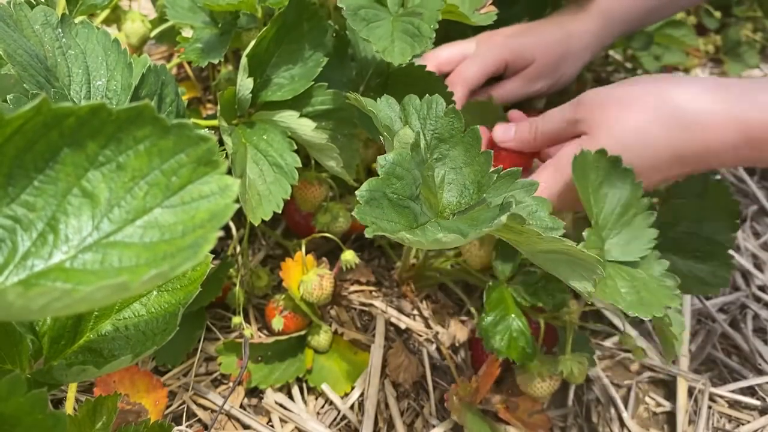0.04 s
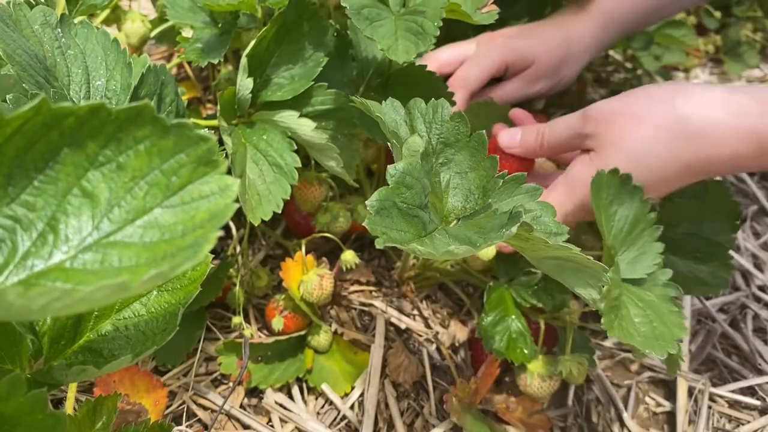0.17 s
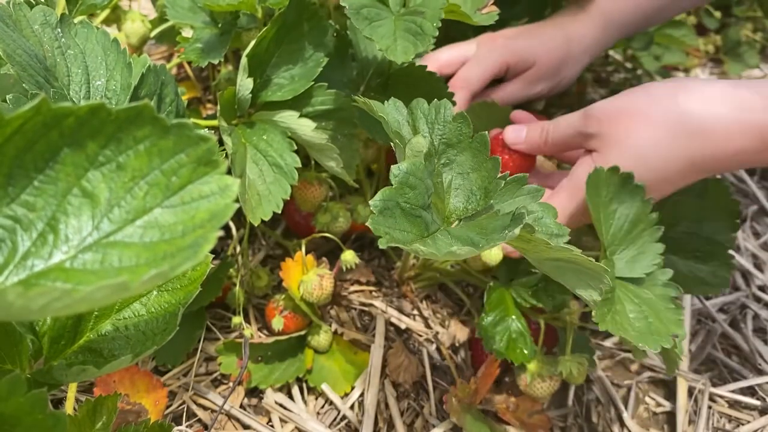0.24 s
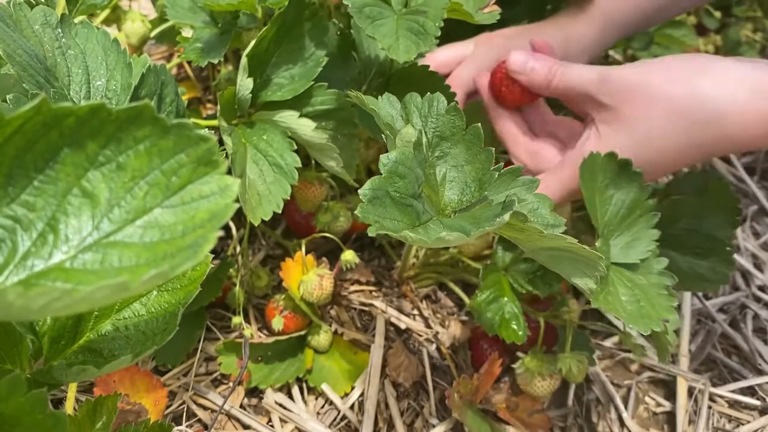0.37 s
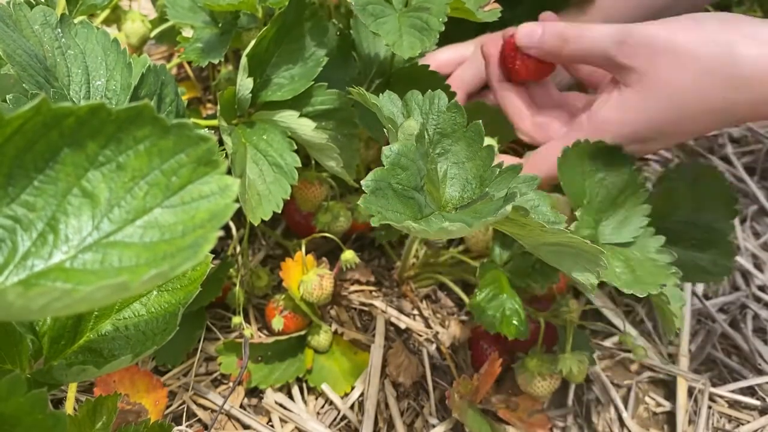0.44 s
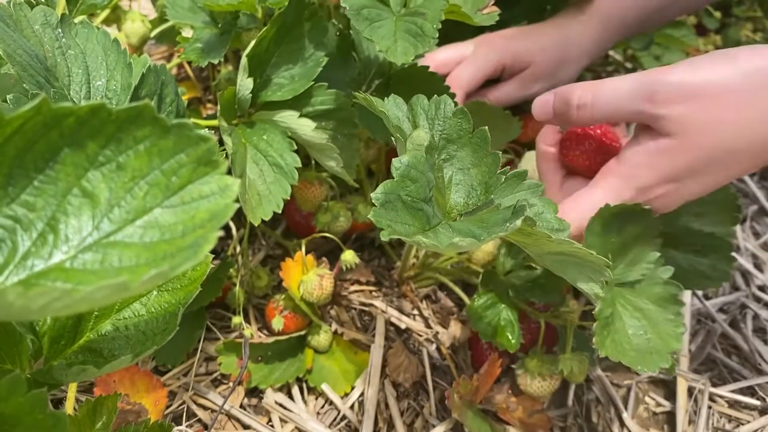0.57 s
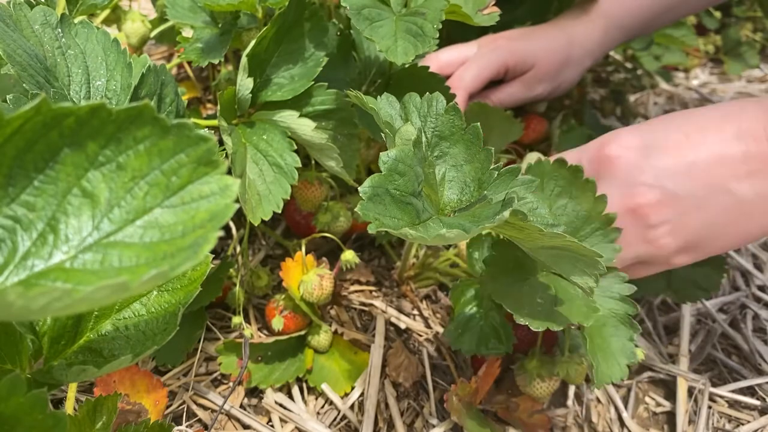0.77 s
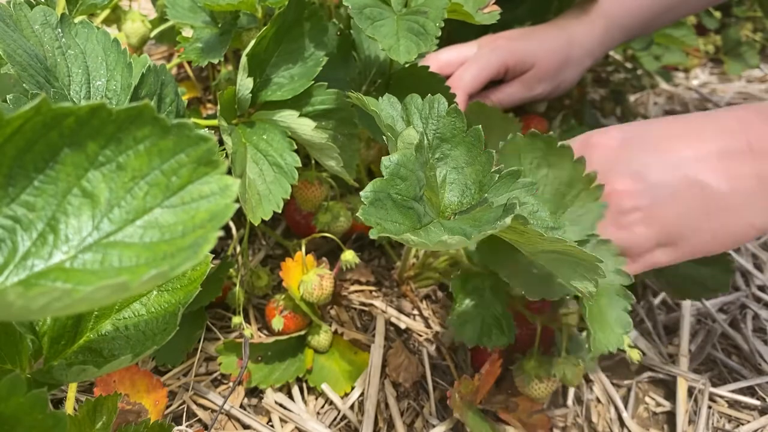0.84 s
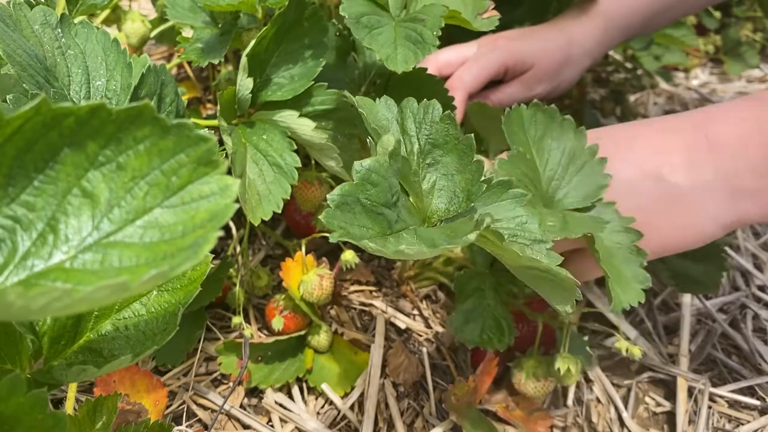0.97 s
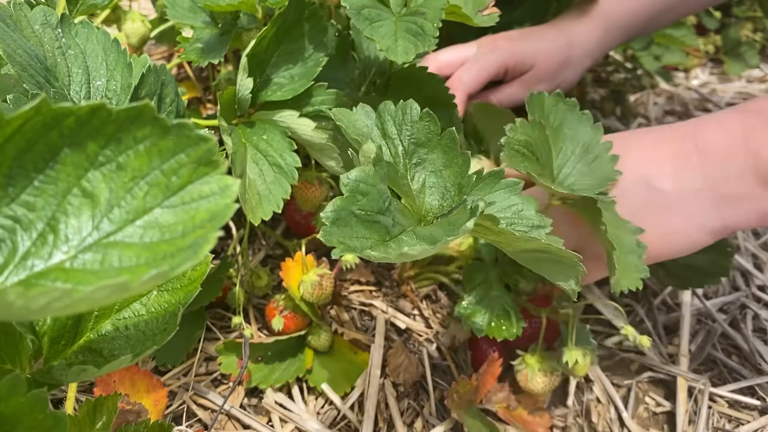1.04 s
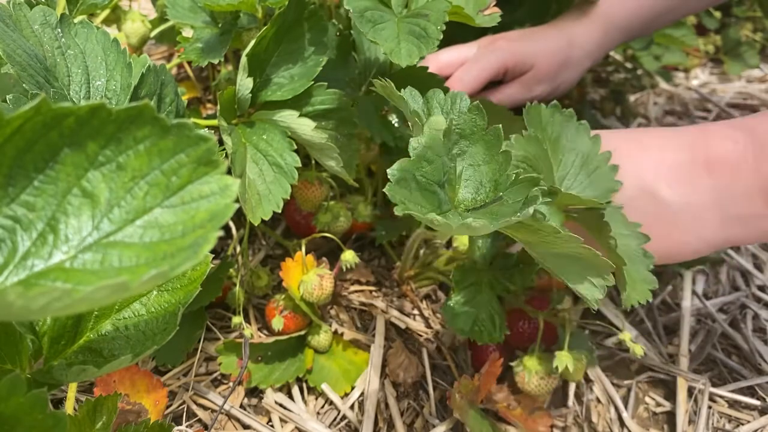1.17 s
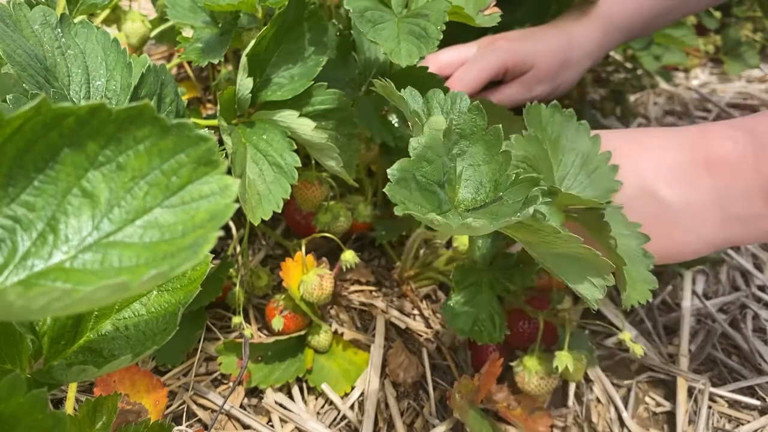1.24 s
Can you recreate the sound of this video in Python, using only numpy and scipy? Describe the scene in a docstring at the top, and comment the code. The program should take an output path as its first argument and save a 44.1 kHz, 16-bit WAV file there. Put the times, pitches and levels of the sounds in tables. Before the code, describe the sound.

One crisp snap of a plucked strawberry, then a hand brushing lightly through leaves.

```python
"""In an open field, a strawberry is picked by hand, close to the microphone.
The taut stalk tears and snaps, and the fruit knocks softly into the fingers. The plant springs back,
then the hand reaches in again and brushes through the leaves, which catch and slip on each other.
Stalks and straw tick here and there over a low outdoor rumble and a faint hiss of air."""
import sys
import numpy as np
from scipy import signal
from scipy.fft import rfft, irfft
from scipy.io import wavfile
from scipy.ndimage import uniform_filter1d

SR = 44100
rng = np.random.default_rng(int(sys.argv[2]) if len(sys.argv) > 2 else 0)


def file_out(sig):
    """Save sig as 16-bit WAV at sys.argv[1]."""
    # one column per channel
    cols = np.atleast_2d(sig).T
    # limit, then scale
    lim = np.clip(cols, -1, 1)
    pcm = np.round(lim * 32767).astype(np.int16)
    wavfile.write(sys.argv[1], SR, pcm)


N = 57330
TIME = np.arange(N) / SR
BIN_HZ = np.maximum(np.arange(N // 2 + 1) * SR / N, 1)

# A "colour" says how strong the low and high pitches of a noise are, compared with each other.
# Colour of the outdoor rumble: pitch_hz, level_db
RUMBLE_COLOUR = [(25, -41), (38, -4), (56, 10), (80, 3), (110, -6), (160, -27)]
# Puffs of air on the microphone: peak_s, level_db, half_length_s
PUFFS = [(0.035, -58.5, 0.025), (.105, -53.5, 0.017), (.335, -52, 0.01), (0.488, -54, 0.021),
         (0.606, -62, 0.0092), (0.78, -58.5, .02), (0.92, -63.5, 0.041), (1.077, -60.5, 0.035),
         (1.142, -57.5, 0.015), (1.259, -59, 0.033)]
# Colour of the far hiss of air: pitch_hz, level_db
AIR_COLOUR = [(250, 2), (600, -3), (1100, -6.5), (1650, -2), (2250, 3), (3000, -7), (3600, -4), (4300, -13),
              (5200, -1), (7000, -19), (15000, -20.5)]
# Loudness of the moving arm and plant: time_s, level_db
MOVEMENT_LEVELS = [(0, -63), (.2, -67.5), (.28, -58.5), (.42, -71), (.485, -59.5), (.55, -71), (.8, -61),
                   (.95, -65), (1.05, -61), (1.17, -66.5), (1.3, -61)]
# Colour of that movement: pitch_hz, level_db
MOVEMENT_COLOUR = [(60, -7), (115, 1.5), (190, -2), (260, -10), (400, -18), (700, -33), (1500, -38)]
# How hard the leaves are brushed: time_s, level_db
BRUSH_LEVELS = [(0, -79), (.025, -65), (.08, -105), (.22, -92), (.27, -63), (.295, -59), (.33, -68),
                (.44, -80), (.63, -75.5), (.73, -68.5), (.775, -67), (.825, -63.5), (.852, -62),
                (.878, -64), (.898, -62.5), (.95, -70), (1.01, -67), (1.19, -72), (1.255, -64.5),
                (1.3, -73)]
# Colour of the brushing: pitch_hz, level_db
BRUSH_COLOUR = [(250, -7.5), (600, -1), (1300, -3), (2600, 3), (4400, -1), (6500, -11.5), (8400, -35),
                (16000, -29)]
# Loudness of skin sliding on leaves: time_s, level_db
SLIDE_LEVELS = [(0, -70), (.02, -64.5), (.09, -83), (.13, -77.5), (.23, -79.5), (.265, -65.5), (.3, -67.5),
                (.37, -82.5), (.41, -73), (.455, -101), (.51, -77.5), (.56, -94), (.67, -77), (.77, -68.5),
                (.86, -62.5), (.95, -72.5), (1.01, -63), (1.19, -74.5), (1.25, -66), (1.3, -71.5)]
# Colour of a fine hiss as the microphone hears it, with a thin high sheen: pitch_hz, level_db
FINE_HISS_COLOUR = [(3000, -5), (5500, 1), (7300, 0), (8400, -12.5), (9400, 2.5), (10300, 3.5), (11200, -3),
                    (12200, -15), (13600, 0.5), (15000, -11), (16000, -23)]
# Flicks of stalks and leaf edges: start_s, level_db, pitch_hz, fade_s (time to fall by 60 dB)
TICKS = [(0.0464, -57.5, 3970, 0.011), (0.1475, -62.5, 9300, 0.0098), (0.187, -58, 10000, 0.0066),
         (.2055, -53, 6600, 0.0077), (0.2822, -44, 3940, 0.008), (0.2867, -50.5, 4000, .015),
         (0.316, -61, 2320, 0.016), (0.4976, -55, 2380, 0.013), (0.498, -60.5, 9900, 0.01),
         (0.5248, -53.5, 3320, 0.019), (0.525, -64, 9550, 0.01), (0.592, -64, 10000, 0.014),
         (0.7148, -60, 9500, 0.016), (0.757, -57, 1120, 0.015), (.765, -52.5, 3220, 0.022),
         (0.7691, -50, 2860, 0.023), (.793, -55.5, 3300, 0.016), (0.7724, -55, 1260, 0.023),
         (0.8364, -47.5, 2480, 0.018), (0.8421, -48, 2650, .016), (0.8465, -53.5, 655, 0.029),
         (0.8471, -48.5, 5600, 0.019), (0.8578, -44.5, 2680, 0.015), (0.865, -45, 900, 0.015),
         (0.8672, -50, 647, 0.028), (0.888, -46.5, 1210, 0.017), (0.886, -46, 4950, 0.011),
         (.9895, -71, 9500, .015), (0.996, -58, 9600, 0.019), (1.054, -66, 696, 0.023),
         (1.155, -57.5, 3030, 0.035), (1.164, -58, 2590, 0.015), (1.248, -56.5, 4500, 0.019)]
# Tones that the stalk and fruit ring with: pitch_hz, level_db, fade_s, left_over_right_db
STALK_TONES = [(740, -41, .03, 0), (1090, -37.5, .018, 1), (1370, -31.5, .01, -3), (2150, -14.4, .008, -1),
               (3550, -17.2, .0024, 7), (5100, -21.5, .0024, 5), (7330, -27.5, .0033, -1),
               (10400, -20.5, .002, -1), (13600, -30, .0013, 3)]
# Colour of the snap's short, bright scatter, with a thin high sheen: pitch_hz, level_db
SCATTER_COLOUR = [(380, -7), (700, -19), (1200, 12.5), (2300, 6), (4500, 2), (6300, -15), (8600, -18),
                  (10300, 7), (12200, -8), (14000, -2), (16000, -16)]
# Colour of the snap's dull tail from the field: pitch_hz, level_db
TAIL_COLOUR = [(300, -17), (1200, -3.5), (2300, 6), (3000, -0.5), (3650, 4.5), (4400, -12), (7000, -8.5),
               (15000, -18)]
# How alike a noise is on the left and right: pitch_hz, likeness (1 = same, 0 = unrelated)
LIKENESS = [(60, 1), (130, 0.91), (290, 0.78), (640, 0.53), (1400, 0.78), (3100, 0.4), (6800, 0.49),
            (10000, -0.011), (15000, 0.078)]
# Which side a noise leans to: pitch_hz, left_over_right_db
BALANCE = [(200, 0.5), (1300, 0), (2400, -1), (4200, 4), (8000, 0)]


def from_db(db):
    """Turn decibels into a number to multiply by."""
    return 10 ** (np.asarray(db) / 20)


def unit_power(sound):
    """Scale a sound so that its average power is 1."""
    return sound / np.sqrt(np.mean(sound ** 2) + 1e-20)


def level(points):
    """Join (time_s, level_db) points into a volume curve."""
    return from_db(np.interp(TIME, *np.transpose(points)))


def across_hz(points):
    """Read a (pitch_hz, value) table at every frequency."""
    hz, value = np.transpose(points)
    return np.interp(np.log(BIN_HZ), np.log(hz), value)


def pan(left_over_right_db):
    """Left and right volumes that lean a sound to one side."""
    return from_db(np.array([[1], [-1]]) * left_over_right_db / 2)


def coloured(gain, source=None):
    """Blend and filter two unrelated signals (white noise by default) into stereo of power 1."""
    shared, side = rfft(rng.standard_normal((2, N)) if source is None else source)
    alike = np.clip(across_hz(LIKENESS), -.99, .99)
    pair = np.sqrt(1 + alike) * shared + np.sqrt(1 - alike) * side * [[1], [-1]]
    return unit_power(irfft(pair * gain * pan(across_hz(BALANCE)), N))


def noise(colour, source=None, edge_db_per_octave=24):
    """Stereo noise of a given colour, dropping away beyond the ends of the table."""
    octaves_outside = np.abs(np.log2(BIN_HZ / np.clip(BIN_HZ, colour[0][0], colour[-1][0])))
    return coloured(from_db(across_hz(colour) - edge_db_per_octave * octaves_outside), source)


def steadied(sound, samples):
    """Even out the chance swells of a noise over so many samples."""
    return sound / np.sqrt(uniform_filter1d(np.mean(sound ** 2, axis=0), samples) + 1e-12)


def burst(start_s, rise_s, fade_s):
    """A volume curve that rises quickly, then dies away."""
    age = np.maximum(TIME - start_s, 0)
    return (1 - np.exp(-age / rise_s)) * np.exp(-np.log(1000) * age / fade_s)


def breeze(rumble_db=-65.5, hiss_db=-75):
    """A low rumble swells with each puff of air on the microphone; the field hisses far away."""
    puffs = sum(from_db(db) * np.exp(-((TIME - peak_s) / half_s) ** 2) for peak_s, db, half_s in PUFFS)
    rumble = (from_db(rumble_db) + puffs) * steadied(noise(RUMBLE_COLOUR), samples=1024)
    return rumble + from_db(hiss_db) * noise(AIR_COLOUR)


def movement():
    """The arm and plant make a soft, low noise as they move."""
    return level(MOVEMENT_LEVELS) * steadied(noise(MOVEMENT_COLOUR), samples=2048)


def friction(clicks_per_s=1000, spread_db=4.5, click_share=0.61):
    """Leaf hairs catch and slip: many tiny clicks of uneven size in a smooth hiss."""
    sizes = from_db(spread_db * np.minimum(rng.exponential(1, N), 3))
    catches = rng.random(N) < clicks_per_s / SR
    clicks = unit_power(catches * sizes * rng.choice([-1, 1], (2, N)))
    hiss = rng.standard_normal((2, N))
    return np.sqrt(click_share) * clicks + np.sqrt(1 - click_share) * hiss


def leaves():
    """Leaves rub on each other and slide along the hand."""
    brushing = level(BRUSH_LEVELS) * noise(BRUSH_COLOUR, friction())
    sliding = level(SLIDE_LEVELS) * noise(FINE_HISS_COLOUR, friction())
    return brushing + sliding


def crunch(start_s, level_db, pitch_hz, fade_s, rise_s=0.00042):
    """A short burst of noise gathered around one pitch."""
    width = 0.22  # as a share of the pitch
    band = 1 / np.hypot(1, (BIN_HZ / pitch_hz - pitch_hz / BIN_HZ) / width)
    return from_db(level_db) * burst(start_s, rise_s, fade_s) * steadied(coloured(band), samples=128)


def ticks():
    """Stalks and leaf edges flick past each other."""
    return sum(crunch(*row) for row in TICKS)


def tear():
    """Fibres tear just before the stalk breaks."""
    return crunch(start_s=.2409, level_db=-28, pitch_hz=10000, fade_s=.004)


def snap(start_s=.2415, right_delay_s=.000033, low_cut_hz=800, noise_rise_s=0.00096):
    """The break makes the stalk ring briefly, with a bright scatter and a dull tail from the field."""
    age = np.maximum(TIME - start_s - np.array([[0], [right_delay_s]]), 0)
    ring = np.zeros((2, N))
    for k, (pitch_hz, level_db, fade_s, side_db) in enumerate(STALK_TONES):
        tone = np.sin(2 * np.pi * pitch_hz * age) * np.exp(-np.log(1000) * age / fade_s)
        ring += (-1) ** k * pan(side_db) * from_db(level_db) * tone  # every other tone is flipped
    low_cut = signal.butter(2, low_cut_hz, "high", fs=SR, output="sos")
    direct = signal.sosfilt(low_cut, ring + 1e-18)
    bright_noise = steadied(noise(SCATTER_COLOUR), samples=64)
    scatter = from_db(-24.5) * burst(start_s, noise_rise_s, fade_s=.016) * bright_noise
    tail = from_db(-63) * burst(start_s, noise_rise_s, fade_s=0.64) * noise(TAIL_COLOUR)
    return direct + scatter + tail


def thud(start_s=.2435, level_db=-38.5, start_hz=585, end_hz=137, sink_s=0.0029):
    """The freed fruit knocks into the fingers: a soft thud that sinks in pitch."""
    age = np.maximum(TIME - start_s, 0)
    pitch_hz = end_hz + (start_hz - end_hz) * np.exp(-age / sink_s)
    tone = np.sin(2 * np.pi * np.cumsum(pitch_hz * (TIME > start_s)) / SR)
    return from_db(level_db) * burst(start_s, rise_s=0.0017, fade_s=0.061) * tone


def scene():
    """Add up the field, the hand among the leaves and the pluck."""
    return breeze() + movement() + leaves() + ticks() + tear() + snap() + thud()


def record(dry):
    """Steeply cut away the very highest treble."""
    cutoff_hz = 15800
    return signal.sosfilt(signal.ellip(10, .1, 70, cutoff_hz, fs=SR, output="sos"), dry)


dry = scene()
out = record(dry)
file_out(out)
```